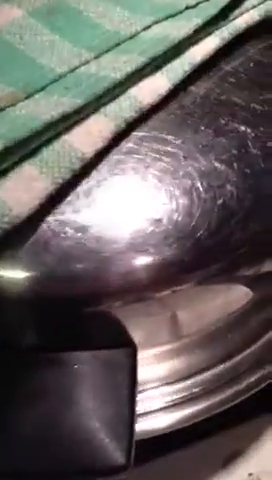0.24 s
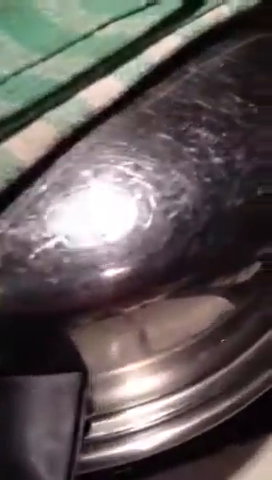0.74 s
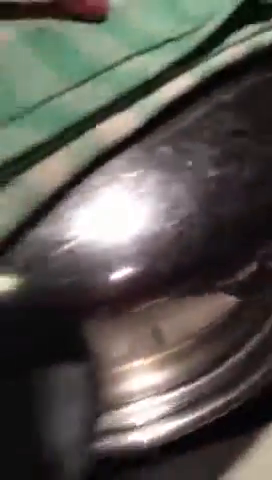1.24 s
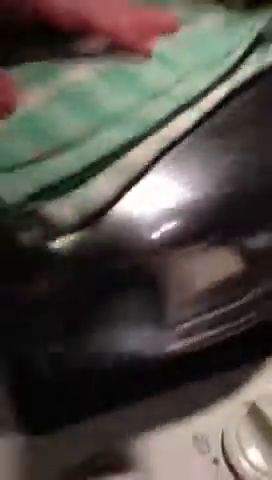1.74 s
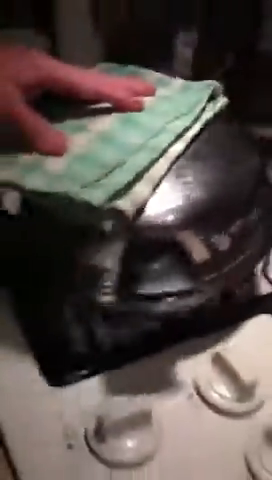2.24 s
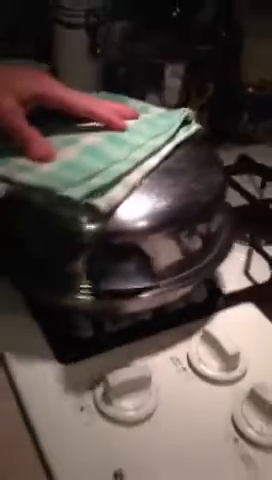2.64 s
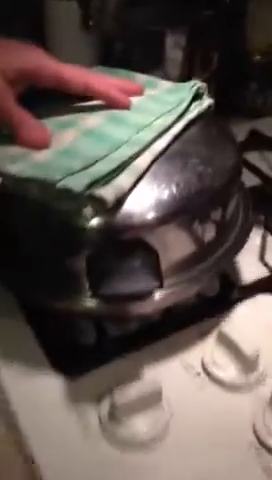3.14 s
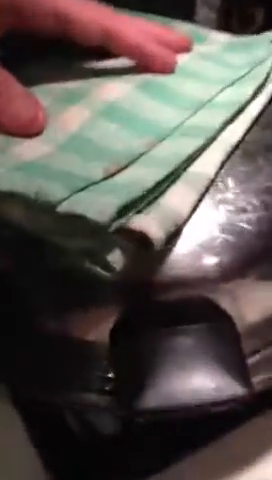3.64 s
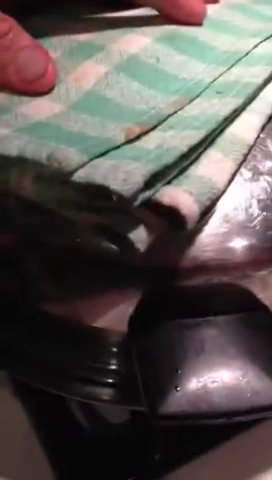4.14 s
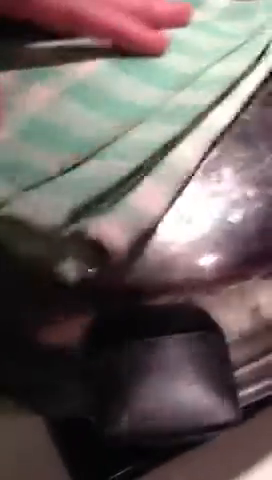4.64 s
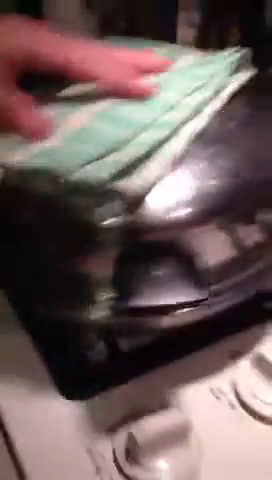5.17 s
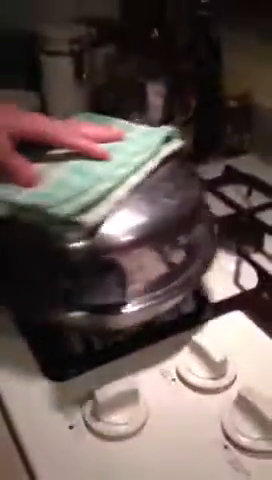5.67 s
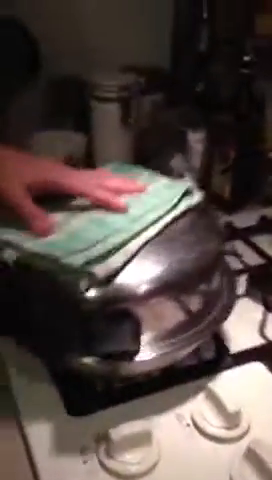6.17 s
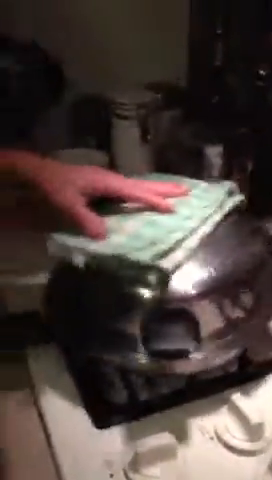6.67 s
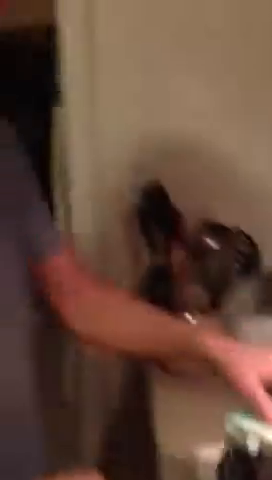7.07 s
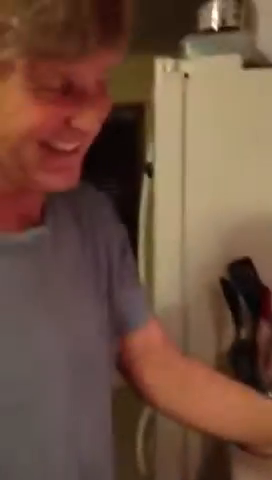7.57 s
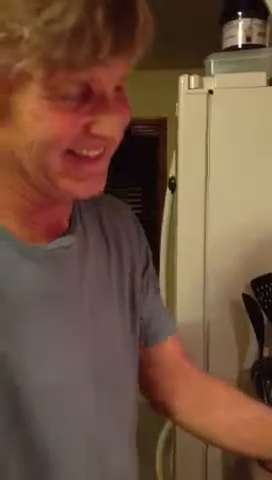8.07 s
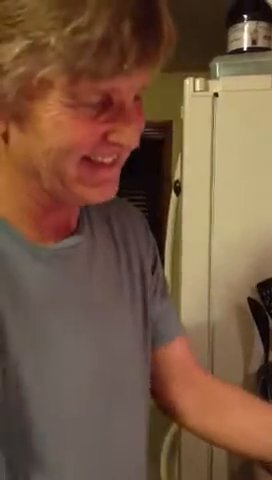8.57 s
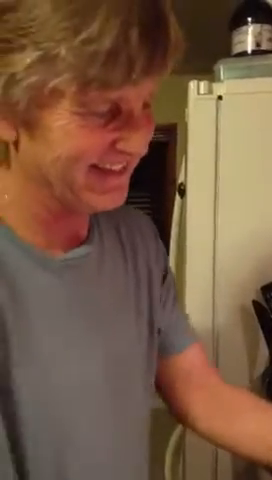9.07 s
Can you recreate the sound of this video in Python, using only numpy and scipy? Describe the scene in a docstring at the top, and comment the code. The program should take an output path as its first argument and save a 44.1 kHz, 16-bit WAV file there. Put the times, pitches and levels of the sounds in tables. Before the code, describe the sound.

Popcorn snaps and pings under a metal lid, then the pan is shaken hard on the stove grate in two rattling bouts.

```python
"""Popcorn in a lidded steel pan on a gas stove in a small kitchen: shaped noise is the flame throughout.
At first the pan rests: kernels snap, puff and ping the lid's modes; rolling is noise and small touches.
Then a bout of knocks on the iron grate, six or seven a second: pushes skid, strike and rebound, clean
strikes, mostly pulls, land twice, as cracks, rattling noise bands and pan modes. The pan rests and pops
stand out, then a longer bout follows. Body resonances and dips, hollow air and a room tail colour it."""
import sys
import numpy as np
from scipy import signal
from scipy.fft import rfft, irfft, next_fast_len
from scipy.io import wavfile

SR = 44100
rng = np.random.default_rng(int(sys.argv[2]) if len(sys.argv) > 2 else 0)


def log_audio(samples):
    """Write samples as a 16-bit WAV file to the path given in sys.argv[1]."""
    # one column per channel
    frames = np.atleast_2d(samples).T
    # limit to full scale, then quantise
    limited = np.clip(frames, -1, 1)
    pcm = np.round(limited * 32767).astype(np.int16)
    wavfile.write(sys.argv[1], SR, pcm)


N = 410571  # samples in the scene
T = np.arange(SR // 2) / SR  # time axis of one short sound, s

# Levels in the tables are relative: the functions add the trims of each sound.
# spectrum of the gas flame and the room: freq_hz, density_db
FLAME_SPECTRUM = [(25, -34), (75, -19), (115, -5.5), (200, 10.5), (300, -4), (420, -34), (600, 4),
                  (1300, -35), (1800, -2), (4200, -11), (8000, -15), (15500, -24)]
# steady sliding, loud in the two bouts: start_s, rumble_db (pan on grate), rustle_db (rolling kernels)
SLIDING_LEVELS = [(0, -53, -52.5), (.39, -60, -64), (.6, -59, -53), (.93, -50, -50), (1.3, -46, -51),
                  (1.659, -33.5, -41.5), (1.94, -37.5, -46), (2.6, -39.5, -45.5), (2.8, -49, -52),
                  (3.1, -59.5, -65), (3.6, -55.5, -53), (3.95, -51, -45.5), (4.3, -63, -70),
                  (4.55, -52, -52.5), (4.8, -35, -42.5), (5.6, -36.5, -42), (7.498, -37, -44.5),
                  (9.31, -37, -40.5)]
# spectrum of the pan grinding on the grate: freq_hz, density_db
RUMBLE_SPECTRUM = [(25, -32), (70, -11), (120, 4), (200, 3), (350, -16), (520, 2), (750, -7), (1200, -3),
                   (2500, -15), (8000, -39)]
# spectrum of the rolling kernels: freq_hz, density_db
RUSTLE_SPECTRUM = [(300, -39), (1000, -12), (1500, -2), (2300, -3.5), (3200, 2), (4100, -1.5), (4900, 6.5),
                   (6500, -0.5), (9500, -6.5), (15500, -16)]
# the sliding swells and fades within each stroke: offset_s (from a strike), gain_db
STROKE_SWING = [(-.075, 2.5), (-.045, -3.5), (-.005, 4), (.04, 0.5), (.07, -6), (.11, -2)]
# the clearest kernels: start_s, crack_db (peak), puff_db, snap_db, fizz_db, pitch_hz (of the snap), ping_db
KERNELS = [(0.069, -21, -34, -43, -47, 5240, 7), (0.0826, -34, -36, -36.5, -43.5, 2060, 6),
           (0.2089, -37, -42.5, -47.5, -55, 1700, -2), (0.2987, -32, -57, -44, -27.5, 5270, 15),
           (0.4008, -22, -40, -34.5, -37, 5570, 0), (0.4132, -12, -28.5, -47, -45, 2730, 2),
           (0.4636, -29, -27, -43, -44, 5720, 2), (0.5322, -20, -40, -35, -54, 1690, -9),
           (0.628, -23, -57.5, -37, -49, 2930, 0), (0.6485, -32, -54, -43, -40, 5630, 0),
           (0.7264, -31, -38.5, -40, -46, 3040, 0), (0.7545, -26, -42, -39, -44, 1700, 0),
           (0.8012, -30, -39, -39, -41, 5750, 0), (0.825, -28, -43, -34.5, -44, 2700, -3),
           (0.8903, -21, -29, -26, -33, 2180, -8), (1.021, -21, -38, -40, -40, 5720, -2),
           (1.07, -26, -25, -36, -35, 1850, 0), (1.1744, -31, -33, -48, -47, 2760, 7),
           (1.4915, -24, -42, -36, -41, 3620, -5), (2.564, -28, -39, -33.5, -40.5, 3620, -4),
           (2.8393, -33, -47, -41, -63, 2020, -8), (2.905, -37, -52, -43, -55, 3940, 2),
           (2.9926, -40, -52, -47, -55, 5590, -7), (3.1193, -38, -47, -48, -51, 3970, 0),
           (3.138, -35, -57, -45.5, -51, 4130, 7), (3.225, -41, -47, -45.5, -54, 1730, 10),
           (3.2614, -27, -41.5, -40, -49, 5150, 0), (3.3418, -31, -47, -43, -54, 2940, -4),
           (3.3843, -28, -47, -36, -44.5, 2450, 0), (3.4147, -30, -57, -39.5, -50, 4110, -3),
           (3.487, -32, -57, -44, -47, 4160, 9), (3.511, -31, -55, -45, -47, 1760, 2),
           (3.5927, -22, -41, -36, -48, 4100, -10), (3.6518, -18, -46, -38, -54, 3670, 0),
           (3.6928, -33, -43.5, -42, -51, 4090, -4), (3.7217, -31, -37, -35, -46, 4110, 8),
           (3.7784, -35, -40, -43, -54, 1680, 2), (3.8088, -36, -41, -43, -54, 4000, 6),
           (3.93, -30, -43.5, -44.5, -43, 4080, 0), (3.9883, -29, -48, -40.5, -47, 4100, 7.5),
           (4.049, -33, -41.5, -44.5, -45, 2320, 6), (4.1253, -37, -39, -45, -52, 3880, 2),
           (4.1505, -31, -45, -49, -46, 7050, 0), (4.305, -24, -45.5, -37, -46.5, 4000, 3),
           (4.3448, -39, -44.5, -48, -54, 1690, 0), (4.4674, -35, -45, -43.5, -51, 4270, -2),
           (4.4967, -35, -47, -49, -55, 3650, 3), (4.5343, -32, -38.5, -42.5, -41.5, 4080, 3),
           (6.1874, -15, -55, -27.5, -38, 3000, -2), (6.538, -1, -38, -42, -30, 4160, 2),
           (7.999, -22, -38, -34, -40, 4150, 2), (9.2564, -35.5, -43, -46, -39, 4080, -5)]
# modes of the lid: freq_hz (nominal), level_db, t60_s
LID_RESONANCES = [(1712, -21, .12), (2121, -19, .12), (2225, -16, .22), (2745, -19, .26), (4102, -9, .13),
                  (4382, -20, .12), (5274, -8, .1), (5744, -18, .09), (6250, -17, .14), (7005, -16, .09),
                  (7706, -16, .09), (8210, -18, .08)]
# loose metal clinks: start_s, pitch_hz, level_db, t60_s
CLINK_NOTES = [(0.300, 5250, -28, 0.16), (0.300, 2250, -48, 0.27), (3.263, 5275, -40, 0.18),
               (3.417, 2730, -48, 0.27), (6.646, 1623, -35.5, 0.21), (7.098, 3330, -26, 0.08),
               (7.127, 4230, -33, 0.079), (7.147, 5020, -28, 0.066), (7.201, 2090, -24, 0.038),
               (8.69, 4140, -16, 0.058)]
# pushed away, the pan skids, strikes and drops back: start_s, crack_db (peak), thud_db, clunk_db,
# metal_db, rattle_t60_s (scaled for each band), clang_hz (strongest), skid_db, skid_lead_s, rebound_db
PUSH_BLOWS = [(0.951, -6, -25.5, -25, -23.5, 0.18, 4200, -34, 0.015, -32.5),
              (1.2704, -1, -22, -22.5, -20, 0.084, 2490, -22.5, 0.016, -26),
              (1.559, -14, -25.5, -23, -20, 0.11, 2520, -36, .019, -35),
              (1.844, -12, -24, -22, -15, 0.14, 2260, -24.5, 0.017, -19.5),
              (2.139, -7.5, -27, -22, -20.5, 0.16, 4150, -28.5, 0.025, -31.5),
              (2.4396, -21, -33.5, -19.5, -20.5, .14, 4350, -30.5, 0.027, -28),
              (2.7288, -8.5, -27.5, -26, -24, 0.16, 2370, -40, .018, -30.5),
              (5.0181, -8, -23, -15.5, -15.5, 0.092, 1880, -20.5, .015, -29.5),
              (5.323, -23, -28, -26, -24.5, 0.13, 4330, -23, .019, -47),
              (5.641, -12, -32, -21, -21, 0.12, 2520, -23, 0.021, -34),
              (5.9414, -26, -31, -24, -24.5, 0.084, 2560, -29, 0.019, -27),
              (6.2445, -29, -31, -22.5, -21, 0.16, 4100, -30.5, .02, -26),
              (6.55, -20, -29, -28, -23, 0.15, 4130, -46, 0.022, -27),
              (6.8473, -25, -27.5, -28, -23, 0.12, 4250, -25.5, 0.018, -29.5),
              (7.1544, -22, -25.5, -24.5, -27.5, 0.15, 1790, -35.5, 0.022, -32),
              (7.4677, -30, -29, -21.5, -24.5, 0.12, 4250, -35.5, 0.016, -27),
              (7.7595, -25, -25.5, -28, -24.5, 0.16, 4110, -32.5, .017, -33.5),
              (8.073, -20, -27, -21.5, -20.5, 0.19, 4600, -24.5, .018, -28),
              (8.3882, -5, -25.5, -22.5, -21.5, .2, 3120, -20.5, .014, -19),
              (8.6877, -18, -24, -22.5, -20, 0.14, 4230, -26, 0.018, -28),
              (9.006, -13, -22, -25, -20, 0.18, 2100, -24, 0.021, -26)]
# clean strikes with no skid, mostly pulls: one edge, then a fainter second contact: start_s,
# crack_db (peak), thud_db, clunk_db, metal_db, rattle_t60_s (scaled for each band),
# clang_hz (strongest), second_contact_db (re the first)
CLEAN_BLOWS = [(1.1048, -12.5, -21, -22, -22.5, 0.084, 2170, -7.5),
               (1.4311, -10.5, -24, -21.5, -25, 0.061, 2000, -1.5),
               (1.718, -11, -27.5, -20, -24.5, 0.076, 2230, -3.5),
               (2.0019, -21, -25, -23.5, -21, 0.12, 2680, -8.5),
               (2.3056, -13, -26.5, -20.5, -22, .12, 1780, -10),
               (2.6057, -23, -27.5, -22.5, -26, 0.065, 2400, -24),
               (4.6233, -21, -25.5, -24.5, -26, .06, 2140, -20),
               (4.6948, -13, -26, -26, -19.5, .11, 2070, -15),
               (4.8689, -7.5, -21.5, -18, -20.5, 0.12, 2200, -25),
               (5.18, -19, -30, -31, -25, 0.11, 1910, -7),
               (5.4975, -22, -23.5, -21, -24, .095, 2360, -10.5),
               (5.8011, -25, -26.5, -24, -28, 0.091, 2750, -13),
               (6.1086, -20, -25, -24, -25, 0.17, 2040, -17),
               (6.408, -14, -26.5, -24.5, -27, 0.095, 1970, -4),
               (6.7142, -21, -26.5, -26, -25.5, .12, 2070, -11),
               (7.0156, -26, -25, -25.5, -25, 0.15, 2660, -4),
               (7.3247, -14.5, -26.5, -31, -25, 0.28, 1970, -13.5),
               (7.6324, -37, -22, -29, -25, .13, 2550, -3.5),
               (7.937, -25, -23.5, -25, -25.5, 0.13, 2010, -8),
               (8.2479, -16, -26, -35, -24, 0.16, 3540, -10.5),
               (8.544, -20, -26.5, -25.5, -26, 0.16, 1980, -9),
               (8.8604, -18, -30, -25, -27.5, 0.11, 2520, -9),
               (9.166, -19, -29.5, -28, -27.5, 0.088, 1880, -7)]
# modes of the pan: freq_hz (nominal), level_db, t60_s
PAN_RESONANCES = [(192, -15, .35), (214, -15, .25), (237, -14, .2), (326, -14, .25), (385, -13, .2),
                  (665, -18, .15), (942, -18, .16), (1905, -14, .08), (2240, -18, .13), (2525, -15, .09),
                  (2745, -21, .2), (2970, -17, .12), (3284, -22, .16), (3635, -16, .09), (4103, -14, .14),
                  (4145, -16, .09), (4390, -17, .14), (4933, -21, .12), (5278, -21, .12), (5910, -18, .08),
                  (6460, -19, .09)]
# spectral colour of the pan and its load: freq_hz, density_db
PAN_SPECTRUM = [(25, -54), (75, -37), (110, -5.5), (200, 4), (480, -0.5), (760, 1.5), (1100, -5),
                (1550, -9), (1950, -6), (2600, -7), (4900, -9.5), (6300, -9), (9000, -17), (15500, -27.5)]
# edges between the four bands, thud, clunk, metal and fizz: edge_hz
BAND_EDGES = (400, 1300, 5000)
# resonances and dips of the lidded pan, narrow and broad: freq_hz, width_hz, gain_db
BODY_RESPONSE = [(226.5, 23, 1.5), (245, 8.9, -1.5), (356, 10, 3), (532, 20, -10.5), (1360, 250, -1),
                 (1670, 39, 0.5), (2520, 47, 2), (3260, 320, -4.5), (4110, 54, 4), (4880, 750, -5.5),
                 (6120, 71, 1.5)]
# air under the lid, as the listener moves round the pan: start_s, gain (linear)
HOLLOW_GAIN = [(0, 2.2), (1.6, 2.2), (2.6, 0.09), (3.8, 2.8), (5.2, 0.34), (7, 0.033), (9.3, 0.09)]

# fainter kernels go off at random all the time
FAINT_POPS_PER_S, FAINT_POP_DB, FAINT_SPREAD_DB = 2.8, -55.5, 0.5
# the rebound lands on the middle of the base, which clangs lower
REBOUND_CLANG_HZ = 2000
# delay from a strike to the rebound or the second contact
REBOUND_S, SECOND_CONTACT_S = 0.046, 0.012
# just before a clean strike the sliding dips for a moment
PAUSE_DB, PAUSE_LEAD_S, PAUSE_WIDTH_S = -3.5, 0.011, 0.017


def amp(db):
    """Logarithmic level: converts decibels to linear gain."""
    return 10 ** (np.asarray(db) / 20)


def unit(x):
    """Mean power: scales a signal to rms 1."""
    return x / np.sqrt(np.mean(x ** 2) + 1e-20)


def unit_onset(x, size=1100):
    """Onset power: scales so that the first 25 ms have rms 1."""
    return x / np.sqrt(np.mean(x[:size] ** 2) + 1e-20)


def decay(t60):
    """Exponential damping: the amplitude falls by 60 dB in t60 seconds."""
    return np.exp(-np.log(1000) * T / t60)


def add(mix, start_s, sound):
    """Superposition: adds a sound to the mix at its start time."""
    part = mix[round(start_s * SR):][:len(sound)]
    part += sound[:len(part)]


def colour(x, spectrum):
    """Spectral shaping: filters x by a curve of (freq_hz, density_db) points on a log frequency axis."""
    hz, db = np.transpose(spectrum)
    size = next_fast_len(len(x))
    f = np.fft.rfftfreq(size, 1 / SR)
    gain = amp(np.interp(np.log(f + 1), np.log(hz), db))
    return irfft(rfft(x, size) * gain, size)[:len(x)]


def flutter(size, hz, depth_db):
    """Random amplitude modulation: a gain that takes a new random value hz times a second."""
    at = np.arange(size) * hz / SR
    return amp(depth_db * np.interp(at, np.arange(size // 8), rng.standard_normal(size // 8)))


def resonance(x, hz, width):
    """Second-order resonance: the part of x that a peak of the given width passes."""
    return signal.lfilter(*signal.iirpeak(hz, hz / width, fs=SR), x)


def burner(level_db=-60):
    """Turbulent flow: the soft steady rush of the flame is shaped noise."""
    return amp(level_db) * unit(colour(rng.standard_normal(N), FLAME_SPECTRUM))


def tumble(low_hz, high_hz, per_s, t60, breadth, spread_db, count=32):
    """Random impacts: many small touches, dry bursts at count pitches, a few much louder than the rest."""
    out = np.zeros(N)
    candidates = 300  # possible touches at each pitch
    probability = per_s * N / SR / (count * candidates)
    for hz in np.geomspace(low_hz, high_hz, count):
        width = breadth * hz
        noise = rng.standard_normal(len(T)) * decay(t60)
        touch = resonance(resonance(noise, hz, width), hz, width)
        touch = unit(touch[:SR // 12])
        for when, chance, size in rng.random((candidates, 3)):
            if chance < probability:
                gain = amp(-spread_db * np.log(size + 0.064))
                add(out, when * N / SR, gain * touch)
    return unit(out)


def sliding(rumble_db=-4.5, bumps_db=-2.5, rustle_db=-10, ticks_db=-3.5):
    """Friction and rolling contact: the pan rumbles and bumps on the grate while kernels tumble inside."""
    start_s, pan_db, kernels_db = np.transpose(SLIDING_LEVELS)
    t = np.arange(N) / SR
    grind = colour(rng.standard_normal(N), RUMBLE_SPECTRUM) * flutter(N, 70, 6.8)
    bumps = tumble(373, 788, per_s=110, t60=0.017, breadth=0.29, spread_db=1.0)
    hiss = colour(rng.standard_normal(N), RUSTLE_SPECTRUM) * flutter(N, 150, 0.56)
    ticks = tumble(1520, 13300, per_s=150, t60=0.028, breadth=0.58, spread_db=4.0)
    ticks = unit(colour(ticks, RUSTLE_SPECTRUM))
    rumble = amp(rumble_db) * unit(grind) + amp(bumps_db) * bumps
    rustle = amp(rustle_db) * unit(hiss) + amp(ticks_db) * ticks
    return amp(np.interp(t, start_s, pan_db)) * rumble + amp(np.interp(t, start_s, kernels_db)) * rustle


def strokes():
    """Amplitude modulation in step with the strikes: the to and fro of the pan sets the gain of its sliding."""
    t = np.arange(N) / SR
    swing_db, pauses = np.zeros(N), np.zeros(N)
    for start_s, *_ in PUSH_BLOWS + CLEAN_BLOWS:
        swing_db += np.interp(t - start_s, *np.transpose(STROKE_SWING), left=0, right=0)
    for start_s, *_ in CLEAN_BLOWS:
        pauses += np.exp(-((t - start_s + PAUSE_LEAD_S) / PAUSE_WIDTH_S) ** 2)
    return amp(swing_db + PAUSE_DB * pauses)


def split(x):
    """Band analysis: four bands, from thud to fizz, that sum to x."""
    f = np.fft.rfftfreq(len(x), 1 / SR)
    below = [1 / (1 + (f / edge) ** 6) for edge in BAND_EDGES]
    weights = np.diff([0 * f, *below, 0 * f + 1], axis=0)
    return irfft(weights * rfft(x), len(x))


def pan_bands(hz=2500, focus_db=0, ripple_db=3.5, width_hz=220):
    """Modal density: countless close modes act as noise; each spot favours some, most of all near hz."""
    f = np.fft.rfftfreq(len(T), 1 / SR)
    ripple = ripple_db * np.interp(f / width_hz, np.arange(200), rng.standard_normal(200))
    spot = amp(ripple + focus_db / (1 + ((f - hz) / width_hz) ** 2))
    noise = irfft(spot * rfft(rng.standard_normal(len(T))), len(T))
    return split(colour(noise, PAN_SPECTRUM))


def burst(band, rise, t60, chatter, contacts_per_s=260, contact_t60=0.022, first_contact=0.5):
    """Repeated contact: a band swells and decays; the chatter share is a firm contact and small rebounds."""
    chance, size = rng.random((2, len(T)))
    contacts = (chance < contacts_per_s / SR) * size ** 2 + first_contact * (T == 0)
    rebounds = unit(signal.oaconvolve(contacts, decay(contact_t60))[:len(T)])
    envelope = (1 - np.exp(-T / rise)) * decay(t60)
    return unit_onset(band * envelope * (1 - chatter + chatter * rebounds))


def crack(bands, t60):
    """Impulsive excitation: the first instant of a hard contact, with peak 1."""
    snap = (bands[1] / 2 + bands[2] + 1.35 * bands[3]) * decay(t60)
    return snap / abs(snap).max()


def ring(modes, band_db, spread_db, detune=0.0065):
    """Modal synthesis: damped sines whose strength and pitch vary with the spot struck and how the pan sits."""
    out = np.zeros(len(T))
    for hz, db, t60 in modes:
        strength = amp(db + band_db[np.searchsorted(BAND_EDGES, hz)] + spread_db * rng.standard_normal())
        pitch = hz + detune * np.sqrt(1000 * hz) * rng.standard_normal()
        out += strength * decay(t60) * np.sin(2 * np.pi * (pitch * T + rng.random()))
    return out


def pop(peak, puff, snap, fizz, hz, ping, crack_db=-6, puff_db=-6, snap_db=-7, fizz_db=-6,
        ring_db=-5, favour_db=4, top_ring_db=-7, favour_width_hz=250):
    """Sudden release: a kernel snaps, puffs and pings the lid, most of all its modes near the snap's pitch."""
    t60 = 0.087
    bands = pan_bands(hz, focus_db=8)
    sound = amp(peak + crack_db) * crack(bands, t60=0.00057)
    sound += amp(puff + puff_db) * burst(bands[0] + bands[1], rise=0.00074, t60=1.06 * t60, chatter=0.27)
    sound += amp(snap + snap_db) * burst(bands[2], rise=0.0014, t60=t60, chatter=0.18)
    sound += amp(fizz + fizz_db) * burst(bands[3], rise=0.00052, t60=t60, chatter=0.23)
    modes = [(f, db + favour_db / (1 + ((f - hz) / favour_width_hz) ** 2), mode_t60)
             for f, db, mode_t60 in LID_RESONANCES]
    return sound + amp(ping + ring_db) * ring(modes, (puff, puff, snap, snap + top_ring_db), spread_db=2.0)


def pops(faint_crack_db=10, faint_fizz_db=-4, faint_ping_db=-2):
    """Random point process: faint pops fall at random times among the clear ones."""
    out = np.zeros(N)
    for start_s, *kernel in KERNELS:
        add(out, start_s, pop(*kernel))
    for when, spot in rng.random((round(FAINT_POPS_PER_S * N / SR), 2)):
        db = FAINT_POP_DB + FAINT_SPREAD_DB * rng.standard_normal()
        hz = LID_RESONANCES[int(spot * len(LID_RESONANCES))][0]
        kernel = pop(db + faint_crack_db, db, db, db + faint_fizz_db, hz, faint_ping_db)
        add(out, when * N / SR, kernel)
    return out


def clinks():
    """Free vibration of one mode: now and then a clear note of the metal stands out."""
    out = np.zeros(N)
    for start_s, hz, db, t60 in CLINK_NOTES:
        envelope = decay(t60) * (1 - np.exp(-T / 0.00056))
        add(out, start_s, amp(db) * np.sin(2 * np.pi * hz * T) * envelope)
    return out


def skid(thud_db=-7, clunk_db=-4.5, scrape_db=-8.5, fizz_db=-14.5, rise_s=0.0097):
    """Friction with repeated contact: the base judders over the grate, a dull scrape with a soft start."""
    levels = (thud_db, clunk_db, scrape_db, fizz_db)
    return sum(amp(db) * burst(band, rise=rise_s, t60=0.12, chatter=0.48)
               for band, db in zip(pan_bands(), levels))


def strike(peak, thud, clunk, metal, t60, hz, crack_db=1, thud_db=-5, clunk_db=-6.0, clang_db=-2.5,
           fizz_db=-10.5, ring_db=0, low_db=0.5):
    """Impact of steel on iron: a crack, then the loose lid and the load rattle while the pan rings."""
    bands = pan_bands(hz, focus_db=4.0)
    sound = amp(peak + crack_db) * crack(bands, t60=0.0063)
    # the lower the band, the longer it takes to die away
    sound += amp(thud + thud_db) * burst(bands[0], rise=0.0017, t60=1.24 * t60, chatter=0.29)
    sound += amp(clunk + clunk_db) * burst(bands[1], rise=0.0069, t60=0.91 * t60, chatter=0.13)
    sound += amp(metal + clang_db) * burst(bands[2], rise=0.0014, t60=0.84 * t60, chatter=0.19)
    sound += amp(metal + fizz_db) * burst(bands[3], rise=0.0039, t60=0.66 * t60, chatter=0.25)
    mode_levels = (thud + low_db, clunk + low_db, metal, metal)
    return sound + amp(ring_db) * ring(PAN_RESONANCES, mode_levels, spread_db=2.0)


def rebound(crack_db=-3, thud_db=-4, clunk_db=0, metal_db=-8, t60=0.16):
    """Secondary impact: the pan drops back on the grate with a duller, softer strike."""
    return strike(crack_db, thud_db, clunk_db, metal_db, t60, REBOUND_CLANG_HZ)


def pushes():
    """Friction, then impact: each push is a skid, a strike and a rebound."""
    out = np.zeros(N)
    for start_s, *blow, skid_db, skid_lead_s, rebound_db in PUSH_BLOWS:
        add(out, start_s - skid_lead_s, amp(skid_db) * skid())
        add(out, start_s, strike(*blow))
        add(out, start_s + REBOUND_S, amp(rebound_db) * rebound())
    return out


def clean_strikes():
    """Double impact without a skid: one edge strikes, then a fainter second contact follows."""
    out = np.zeros(N)
    for start_s, *blow, second_contact_db in CLEAN_BLOWS:
        add(out, start_s, strike(*blow))
        add(out, start_s + SECOND_CONTACT_S, amp(second_contact_db) * strike(*blow))
    return out


def kitchen(x, low_db=-7, mid_db=-9, high_db=-13, top_db=-15):
    """Diffuse reverberation: a short tail of decaying noise, longest and strongest in the bass."""
    bands = split(rng.standard_normal(len(T)))
    tail = np.zeros(len(T))
    for band, db, t60 in zip(bands, (low_db, mid_db, high_db, top_db), (1.0, 0.083, 0.54, 0.19)):
        fade = decay(t60) * (1 - np.exp(-(T / 0.0088) ** 2))
        tail += amp(db) * band * fade / np.linalg.norm(fade)
    return signal.oaconvolve(x, tail)[:N]


def lidded_pan(x, air_hz=490, air_width_hz=32):
    """Body and cavity resonance: the metal boosts or dips parts of every sound; the air rings hollow."""
    for hz, width, db in BODY_RESPONSE:
        x = x + (amp(db) - 1) * resonance(x, hz, width)
    hollow = np.interp(np.arange(N) / SR, *np.transpose(HOLLOW_GAIN))
    return x + hollow * resonance(x, air_hz, air_width_hz)


def scene():
    """Superposition of sources: pan and popcorn, close by, with the kitchen around them."""
    hits = pushes() + clean_strikes() + pops() + clinks()
    steady = strokes() * sliding() + burner()
    return lidded_pan(hits + kitchen(hits) + steady)[None]


def record(dry, low_cut_hz=65, cut_off_hz=15600):
    """Band limit and saturation: the microphone loses deep bass and extreme treble and rounds hard peaks."""
    thin = signal.sosfilt(signal.butter(2, low_cut_hz, "high", fs=SR, output="sos"), dry)
    rounded = thin / (1 + (thin / 0.7) ** 4) ** 0.25
    low_pass = signal.firwin(401, cut_off_hz, window=("kaiser", 8), fs=SR)
    return signal.oaconvolve(rounded, low_pass[None], "same")


dry = scene()
out = record(dry)
log_audio(out)
```